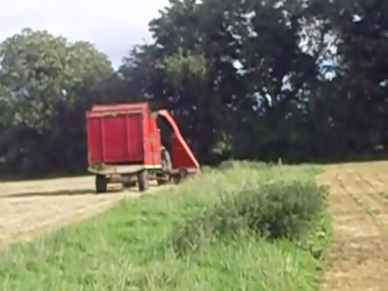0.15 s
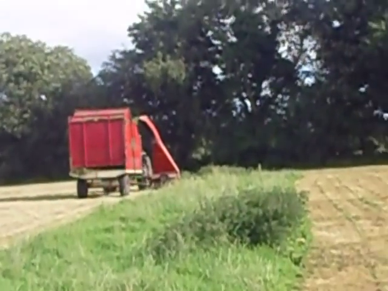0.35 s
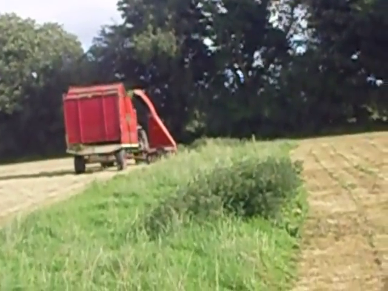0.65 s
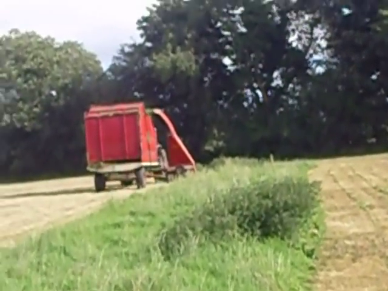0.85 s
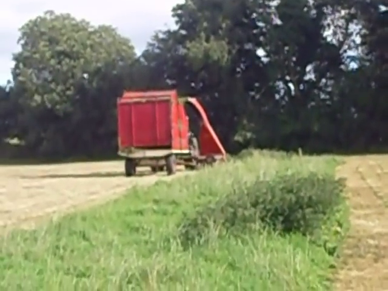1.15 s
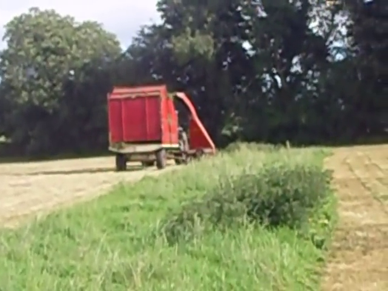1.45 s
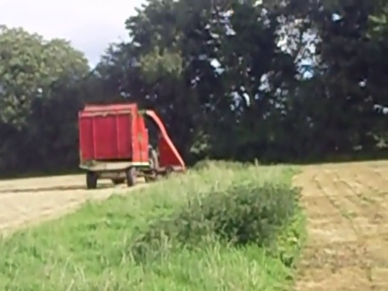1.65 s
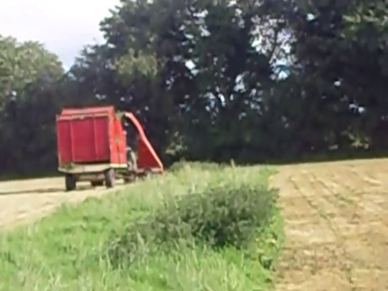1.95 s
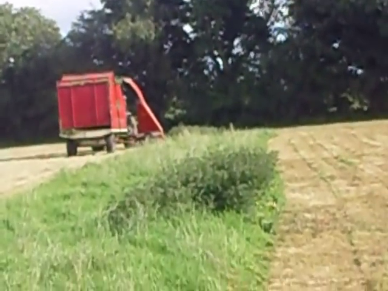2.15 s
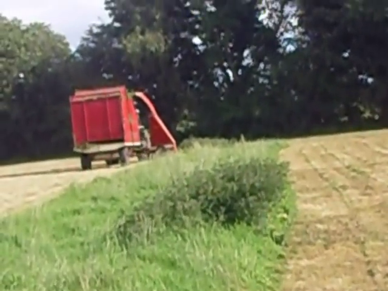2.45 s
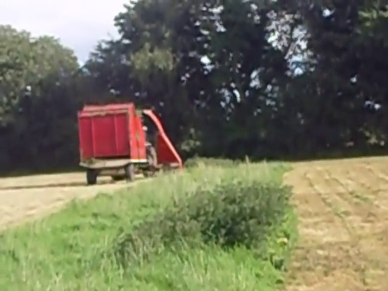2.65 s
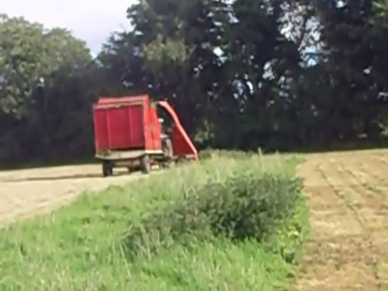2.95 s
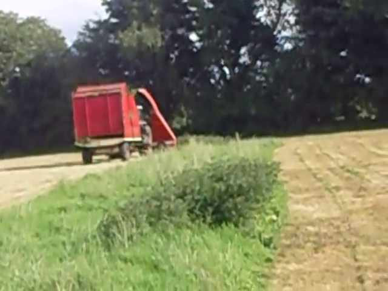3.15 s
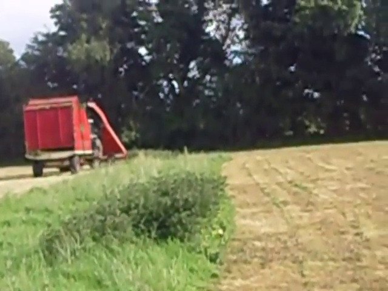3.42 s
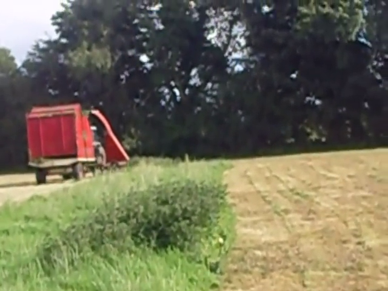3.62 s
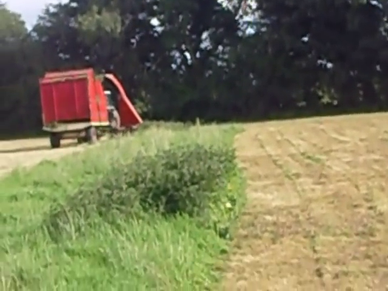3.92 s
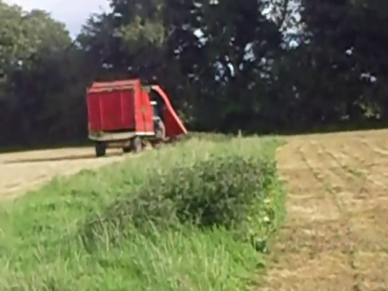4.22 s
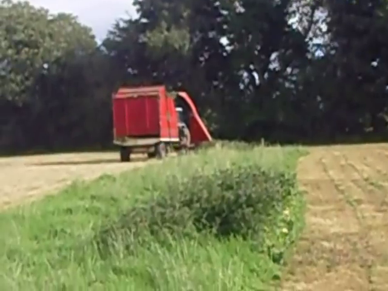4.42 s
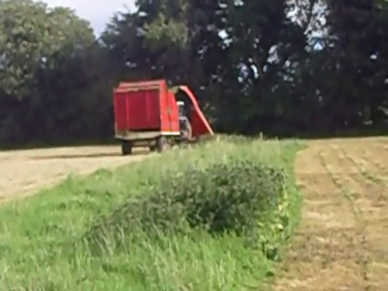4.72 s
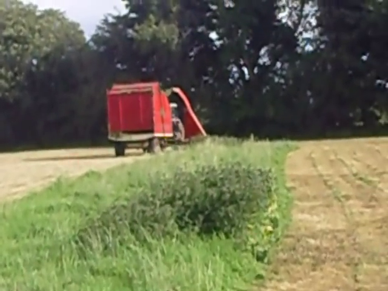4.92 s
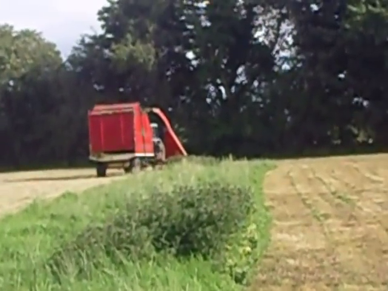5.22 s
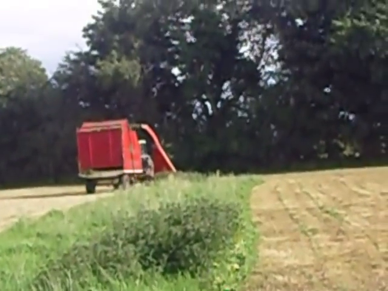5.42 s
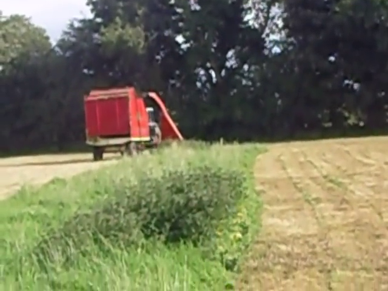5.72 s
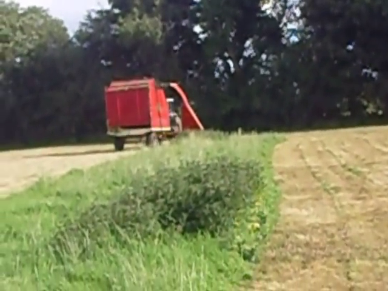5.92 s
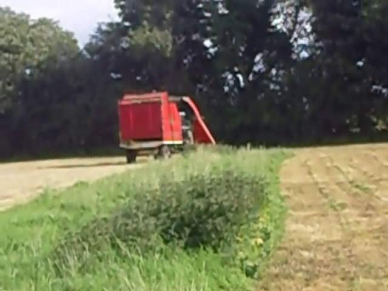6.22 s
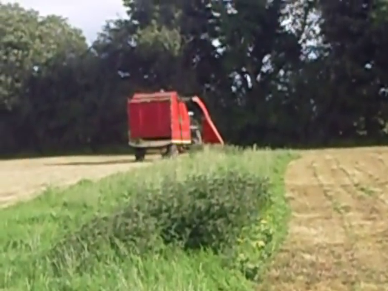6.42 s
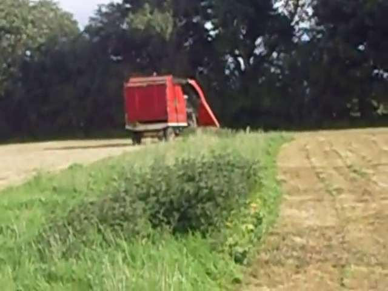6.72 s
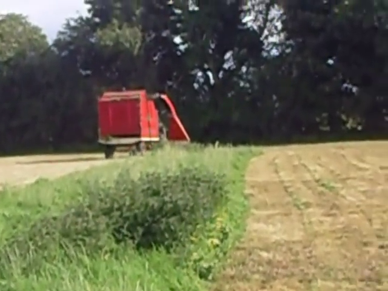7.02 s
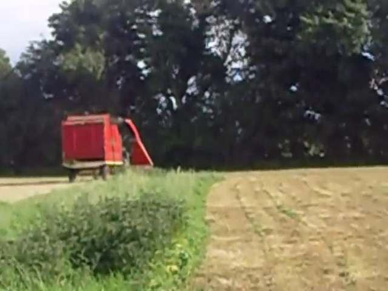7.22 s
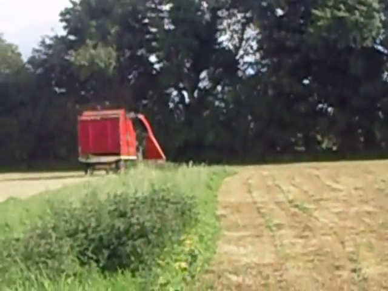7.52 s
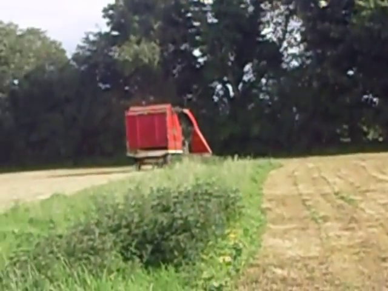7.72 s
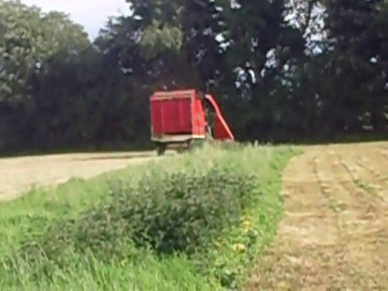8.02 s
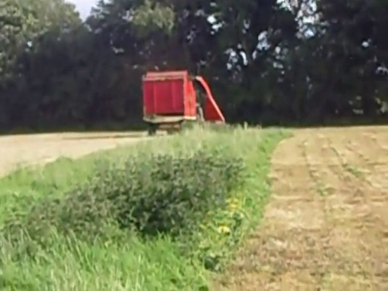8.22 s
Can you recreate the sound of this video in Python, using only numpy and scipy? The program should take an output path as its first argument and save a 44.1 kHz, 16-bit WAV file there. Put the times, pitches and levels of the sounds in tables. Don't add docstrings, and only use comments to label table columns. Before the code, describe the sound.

Low tractor engine drone with throbbing rotor, metallic flail clacks and blown-grass hiss, moving away outdoors as wind and handling bumps thud on the microphone.

```python
import sys
import numpy as np
from scipy import signal
from scipy.fft import rfft, irfft, next_fast_len
from scipy.io import wavfile
from scipy.ndimage import uniform_filter1d, map_coordinates

SR = 44100
rng = np.random.default_rng(int(sys.argv[2]) if len(sys.argv) > 2 else 0)


def decibels_to_gain(level_db):
    exponent = np.asarray(level_db, float) / 20
    return 10 ** exponent


def digitize_waveform(pressure):
    field = np.atleast_2d(pressure).T
    bounded = np.clip(field, -1, 1)
    quanta = np.round(bounded * 32767).astype(np.int16)
    wavfile.write(sys.argv[1], SR, quanta)


N = 369116

# time in seconds, cylinder firings per second.
ENGINE_SPEED = [(0, 72.4), (.3, 71.8), (1, 72.5), (2, 72.9), (2.75, 72.9), (3.2, 72.5), (4.2, 72.7),
                (4.8, 73.2), (5.1, 75), (5.5, 75.9), (6, 76.9), (6.5, 77.3), (7, 77.2), (7.5, 77.6),
                (8, 78), (8.37, 78)]
# multiple of the firing rate, level in dB against the third multiple.
EXHAUST_OVERTONES = [(4, -12.5), (5, -24)]
# multiple of the firing rate, level in dB against the throb.
ROTOR_TONES = [(2 / 3, 0), (4 / 3, -7.5), (5 / 3, -12), (7 / 3, -10.5), (8 / 3, -16), (3.42, -19)]
# time in seconds, peak in dB, dull part in dB against the peak.
FLAIL_STRIKES = [(0.625, -29, 3), (0.7964, -24.5, 0), (0.8724, -32, 10), (1.3544, -30.5, 10),
                 (1.496, -26, 3), (2.8374, -24, 3), (3.2114, -27.5, -5), (3.2779, -33, -12),
                 (3.3364, -23.5, -15), (3.3714, -28, 3), (3.4454, -29, 9), (3.7713, -30, 7.5),
                 (3.8761, -27.5, -1), (3.978, -30.5, 9), (4.058, -24, -2), (4.2617, -25.5, 4),
                 (4.341, -29, 1), (4.375, -18.5, -2.5), (4.4333, -18, -5), (4.5044, -22.5, -6),
                 (4.6114, -28, 6), (4.6404, -29, 9), (4.8474, -31, 9), (5.5209, -30.5, 4),
                 (6.7471, -28.5, 0), (6.899, -28, 0), (7.0194, -34, 8.5), (7.1816, -29.5, -3),
                 (7.2205, -29.5, -6), (7.3724, -31, -1)]
# time in seconds, case ring in dB, push on the diaphragm (negative = pull).
CASE_BUMPS = [
    (.868, -32, .04),
    (1.77, -32, .04),
    (5.328, -34, .04),
    (5.898, -35, .08),
    (5.941, -34, .1),
    (6.099, -23, .28),
    (6.1085, -22, -.25),
    (7.512, -30, .13),
    (8.111, -42, .02),
]
# frequency in Hz, level in dB per Hz.
WIND_COLOUR = [(5, -27), (12, -24), (25, -5.5), (45, -10), (80, -13), (200, -45), (400, -120)]
# frequency in Hz, level in dB.
ROAR_COLOUR = [(30, -40), (60, -1.5), (110, -2.5), (180, -4), (250, -11), (310, -19), (420, -33.5),
               (700, -38), (1200, -120)]
# frequency in Hz, level in dB.
CLATTER_COLOUR = [(190, -27), (330, -27), (437, -14.5), (498, -15), (664, -2.5), (767, 0), (874, -1.5),
                  (975, -6), (1270, -3), (1700, -7), (2210, -23), (3740, -120)]
# frequency in Hz, level in dB.
HISS_COLOUR = [(1350, -8), (2300, -5), (3080, -8), (3900, -3), (6080, -7.5), (7690, -9), (9320, -15),
               (10600, -18.5), (11700, -20.5), (17000, -29.5)]
# frequency in Hz, level in dB.
LENS_COLOUR = [(660, -16), (1320, 0), (2000, -6), (2700, -10), (3300, -12), (4000, -12), (4600, -19),
               (5300, -11), (6000, -16), (7500, -26), (8600, -17), (10500, -38)]
# frequency in Hz, width in Hz, depth from 0 to 1.
HOUSING_DIPS = [(3095, 108, 0.8), (7660, 450, 0.55), (10540, 500, 0.49), (13100, 1000, 0.2)]
# frequency in Hz, level in dB.
CHUTE_COLOUR = [(1300, -27), (1600, -11), (1950, 0.5), (2300, -8.5), (2800, -12.5), (3200, -11.5),
                (4000, -49)]
# frequency in Hz, level in dB per Hz.
STRIKE_COLOUR = [(1500, -8), (2400, -19.5), (4000, 2), (6000, -4.5), (8000, -10), (11000, -28),
                 (17000, -42)]
# time in seconds, effort in dB.
WORK_EFFORT = [(0.0, -33.5), (0.35, -30.5), (0.65, -32.5), (0.88, -29.5), (1.05, -33), (1.33, -31),
               (1.86, -36), (2.42, -34.5), (2.54, -38.5), (2.58, -33), (2.7, -38.5), (2.8, -34.5),
               (3.26, -37), (4.75, -35), (5.13, -38), (5.69, -39.5), (7.88, -41.5), (8.37, -43.5)]
# time in seconds, flow in dB.
GRASS_FLOW = [(0.0, -44), (0.02, -40.5), (1.11, -43.5), (1.36, -43), (1.83, -44.5), (2.45, -42),
              (3.44, -44.5), (3.51, -45.5), (3.97, -44), (4.07, -41), (4.32, -44), (4.37, -39.5),
              (4.85, -45), (4.97, -48), (6.66, -52), (6.94, -52), (7.93, -53.5), (8.3, -53)]
# centre in seconds, half length in seconds, change in dB.
ENGINE_STUMBLES = [
    (.42, 0.11, -14),
    (.65, .12, -11),
    (2, 0.033, -6),
    (3.6, 0.19, -3.5),
    (4.15, 0.1, -1),
    (5.45, 0.19, -4.5),
    (6.3, 0.18, -2.5),
    (7.1, .15, -5),
    (7.6, 0.12, -6.5),
]
# centre in seconds, half length in seconds, throb gain in dB.
ROTOR_SURGES = [(.1, 0.33, 3), (.6, 0.38, 15), (1.3, 0.25, 13), (2.3, 0.11, 8.5), (2.65, 0.2, 9.5),
                (3.62, 0.16, 14), (4.25, .15, 7), (4.88, 0.16, 12), (5.7, 0.29, 2.5), (6.9, .25, -4),
                (7.6, 0.065, 14)]
# centre in seconds, half length in seconds, second multiple in dB,
# third multiple in dB.
EXHAUST_SWELLS = [(.3, .2, -4, 3.5), (.6, 0.078, 1, 4), (1, 0.15, 1.5, 6.5), (1.6, 0.11, 2, -1),
                  (2, .25, 0.5, -4.5), (2.4, 0.11, 4, 0), (2.6, 0.081, -9, 5), (3.1, 0.43, 2, -6),
                  (3.6, 0.15, -4, 3.5), (3.95, 0.11, -5, 5), (4.2, .1, 4, -1), (5, 0.27, -9, -3),
                  (5.4, 0.067, 2.5, -7), (5.8, 0.074, -5, -6)]
# centre in seconds, half length in seconds, roar gain in dB.
GRASS_WADS = [(.25, 0.23, 1.5), (.85, 0.073, 4.5), (1.26, .05, -8), (1.54, 0.1, 2), (2.24, 0.12, 1.5),
              (3.08, 0.29, 3), (4.15, 0.12, 4), (4.31, 0.059, 5.5), (4.75, 0.11, 3), (4.95, 0.086, 2.5),
              (5.33, 0.05, 7), (5.92, 0.041, 5), (6.11, .03, 2.5), (6.8, .2, -1.5), (6.5, 0.043, 0),
              (7.51, 0.037, 5.5), (7.95, 0.22, -1)]
# centre in seconds, half length in seconds, dB over the breeze.
WIND_GUSTS = [(.86, 0.055, 17), (1.15, .12, 18), (1.54, .08, 15.5), (2.05, .1, 10), (2.5, 0.085, 3),
              (2.8, 0.053, -7.5), (2.98, 0.044, 2), (3.27, 0.039, 6), (3.42, .04, 9), (3.8, 0.11, 8),
              (4.3, 0.046, 8), (4.52, 0.082, 15), (4.93, 0.088, 15.5), (5.3, 0.14, 12), (5.9, 0.11, 8),
              (6.11, 0.055, 11), (6.5, .05, 3.5), (6.75, 0.14, -8), (7.12, .12, 7.5), (7.27, 0.046, 4),
              (7.51, 0.058, 2), (7.95, .15, -1)]
# centre in seconds, half length in seconds,
# chute ring in dB, hiss in dB.
GRASS_CLUMPS = [(.23, .04, 2, 1), (1, 0.075, -2, -2), (2.2, 0.16, 2.5, -1.5), (3.44, 0.018, 1, 0.5),
                (3.55, .03, 2, 1), (3.75, 0.28, 1, -2), (4.11, 0.15, 2, -0.5), (4.5, 0.13, -1, -0.5),
                (4.93, .06, 4.5, 0.5), (5.18, .03, 2, 1), (5.39, 0.054, 3.5, 0), (5.52, 0.034, 1, 1),
                (6.24, 0.24, 4, 0.5), (6.76, .04, 6.5, 2.5), (7.01, .04, 5, 3), (7.24, .05, 3.5, 2),
                (7.5, 0.34, 4, 1), (8.07, 0.11, -3, 1)]
# centre in seconds, half length in seconds, dB over its rest.
TRAILER_BOOMS = [
    (.1, 0.12, 13.5),
    (.3, 0.13, 20),
    (.55, 0.11, 4),
    (.85, .08, 13),
    (1.3, .1, 8),
    (2.1, 0.11, 5),
    (2.6, 0.13, 9),
    (4.2, 0.23, 12.5),
    (5.35, .06, 11),
]
# centre in seconds, half length in seconds,
# frequency in Hz, gain in dB.
AIR_EDDIES = [
    (1.2, .2, 8800, 4.5),
    (2.9, .45, 11500, 0),
    (3.7, 0.27, 2700, 2.5),
    (4.55, .15, 2680, -6),
    (4.05, .2, 10000, -2.5),
    (5.65, 0.17, 2800, -2),
    (6.3, 0.7, 950, -5),
    (7.9, 0.38, 7000, -4.5),
]


def unit(x):
    return x / np.sqrt(np.mean(x ** 2) + 1e-20)


def along(points, hz):
    f, v = np.transpose(points)
    return np.interp(np.log(hz + 1), np.log(f + 1), v)


def curve(rows):
    s, value = np.transpose(rows)
    return np.interp(np.arange(N) / SR, s, value)


def wobble(rate):
    coarse = np.arange(0, N + 16, 16)
    knots = rng.standard_normal(int(N * rate / SR) + 4)
    return np.interp(np.arange(N), coarse, map_coordinates(knots, [coarse * rate / SR]))


def swells(rows, column=2):
    t = np.arange(0, N + 64, 64) / SR
    total = sum(row[column] * np.exp(-((t - row[0]) / row[1]) ** 2) for row in rows)
    return np.interp(np.arange(N) / SR, t, total)


def step(at_s, over_s):
    return 0.5 + 0.5 * np.tanh((np.arange(N) / SR - at_s) / over_s)


def filtered(x, response):
    m = next_fast_len(N + SR // 2)
    return irfft(rfft(x, m) * response(np.fft.rfftfreq(m, 1 / SR)), m)[..., :N]


def shape(spectrum):
    return lambda hz: decibels_to_gain(along(spectrum, hz))


def coloured(x, spectrum):
    return unit(filtered(x, shape(spectrum)))


def patchy(depth_db):
    z = signal.stft(rng.standard_normal(N + 512), nperseg=512)[2]
    field = uniform_filter1d(rng.standard_normal(z.shape), 10, 0)
    field = uniform_filter1d(field, 8, 1)
    return signal.istft(z * decibels_to_gain(depth_db * unit(field)), nperseg=512)[1][:N]


def tone(multiple, turns, flutter_db, drift):
    phase = 2 * np.pi * (multiple * turns + rng.random()) + drift * wobble(5)
    return np.sqrt(2) * decibels_to_gain(flutter_db * wobble(7.7)) * np.sin(phase)


def distance_db():
    start_m, speed_m_per_s = 28.5, 3.4
    return -20 * np.log10(1 + speed_m_per_s * np.arange(N) / SR / start_m)


def load_eased():
    return step(at_s=6.06, over_s=0.41)


def exhaust(turns):
    far_db = distance_db()
    first_db = -23 + far_db + swells(ENGINE_STUMBLES)
    second_db = -31 + 0.44 * far_db + swells(EXHAUST_SWELLS)
    third_db = -39.5 + far_db + 5.5 * load_eased() + swells(EXHAUST_SWELLS, 3)
    out = decibels_to_gain(first_db) * tone(1, turns, flutter_db=1.5, drift=0.077)
    out += decibels_to_gain(second_db) * tone(2, turns, flutter_db=1.33, drift=0.27)
    out += decibels_to_gain(second_db - 7) * tone(1.87, turns, flutter_db=1.5, drift=0.3)
    out += decibels_to_gain(second_db - 9) * tone(1.95, turns, flutter_db=1.5, drift=0.3)
    out += decibels_to_gain(third_db) * tone(3, turns, flutter_db=1.1, drift=0.14)
    for multiple, db in EXHAUST_OVERTONES:
        out += decibels_to_gain(third_db + db) * tone(multiple, turns, flutter_db=2.6, drift=0.16)
    return out


def rotor(turns):
    throb_db = -35.5 + 0.1 * distance_db() - 10 * load_eased() + swells(ROTOR_SURGES)
    tones = sum(decibels_to_gain(db) * tone(k, turns, flutter_db=2.0, drift=0.29) for k, db in ROTOR_TONES)
    return decibels_to_gain(throb_db) * tones


def trailer_boom(turns):
    return decibels_to_gain(-46.5 + swells(TRAILER_BOOMS)) * tone(1.62, turns, flutter_db=2.5, drift=0.4)


def clatter(beat, feed_db):
    noise = patchy(0.37) * decibels_to_gain(0.71 * beat + 0.88 * feed_db)
    return decibels_to_gain(curve(WORK_EFFORT) + 0.78) * coloured(noise, CLATTER_COLOUR)


def chute(beat, feed_db):
    flow_db = curve(GRASS_FLOW)
    level_db = flow_db[0] + 0.92 * (flow_db - flow_db[0]) + 2.5
    level_db += 5.5 * step(at_s=2.6, over_s=0.81)
    noise = patchy(0.38) * decibels_to_gain(1.1 * beat + 1.1 * feed_db)
    return decibels_to_gain(level_db + swells(GRASS_CLUMPS) - 3.5) * coloured(noise, CHUTE_COLOUR)


def grass_hiss(beat, feed_db):
    noise = patchy(0.39) * decibels_to_gain(1.1 * beat + 0.98 * feed_db)
    return decibels_to_gain(curve(GRASS_FLOW) + swells(GRASS_CLUMPS, 3) + 3) * coloured(noise, HISS_COLOUR)


def machine(turns):
    beat = np.cos(2 * np.pi * turns)
    feed_db = 0.36 * wobble(12) + 0.51 * wobble(45) + 0.66 * wobble(150)
    return clatter(beat, feed_db) + chute(beat, feed_db) + grass_hiss(beat, feed_db)


def roar():
    effort_db = uniform_filter1d(curve(WORK_EFFORT), size=SR // 2)
    level_db = effort_db[0] + 0.72 * (effort_db - effort_db[0]) + 6 + swells(GRASS_WADS)
    noise = rng.standard_normal(N) * decibels_to_gain(0.8 * wobble(12))
    return decibels_to_gain(level_db) * coloured(noise, ROAR_COLOUR)


def wind():
    breeze_db = -38
    level_db = breeze_db + swells(WIND_GUSTS) + 2.5
    return decibels_to_gain(level_db) * coloured(rng.standard_normal(N), WIND_COLOUR)


def camera_electronics():
    whine = decibels_to_gain(-84) * np.sin(2 * np.pi * 15735 * np.arange(N) / SR)
    return decibels_to_gain(-71.0) * rng.standard_normal(N) + whine


def clacks():
    t = np.arange(SR // 20) / SR
    bright, dull = np.zeros(N + SR), np.zeros(N + SR)
    strays_per_s, stray_db = 2, -37
    chance = rng.random((round(strays_per_s * N / SR), 3))
    strays = [(a * N / SR, stray_db + 4 * (b - 0.5), 8 * c) for a, b, c in chance]
    envelope = decibels_to_gain(-60 * t / 0.05) * (1 - np.exp(-t / 0.0012))
    for s, db, dull_db in list(FLAIL_STRIKES) + strays:
        burst = rng.standard_normal(len(t)) * envelope
        start = round(s * SR)
        bright[start:][:len(t)] += decibels_to_gain(db - 4.5) * burst
        dull[start:][:len(t)] += decibels_to_gain(db + dull_db + 1.0) * burst
    body_colour = CLATTER_COLOUR[:-2] + CHUTE_COLOUR[1:]
    bright = decibels_to_gain(4.0) * filtered(bright[:N], shape(STRIKE_COLOUR))
    return bright + decibels_to_gain(8.5) * filtered(dull[:N], shape(body_colour))


def bumps():
    t = np.arange(SR // 10) / SR
    case = np.sin(2 * np.pi * 350 * t) * decibels_to_gain(-60 * t / 0.03) * (1 - np.exp(-t / 0.002))
    u = t / 0.0014
    shove = 3.8 * u ** 2 * (1 - u / 3) * np.exp(-u)
    out = np.zeros(N + SR)
    for s, db, push in CASE_BUMPS:
        out[round(s * SR):][:len(t)] += np.sign(push) * decibels_to_gain(db + 5) * case + push * shove
    return out[:N]


def eddies(x):
    hz, t, z = signal.stft(x, SR, nperseg=1024)
    gain_db = 0
    for s, half_s, centre_hz, db in AIR_EDDIES:
        width_hz = 0.14 * centre_hz
        across_hz = (((hz - centre_hz) / width_hz) ** 2)[:, None]
        gain_db = gain_db + db * np.exp(-((t - s) / half_s) ** 2 - across_hz)
    return signal.istft(z * decibels_to_gain(gain_db), SR, nperseg=1024)[1][:N]


def lens():
    start_s, pitch_hz, level_db, uneven_turns = 8.322, 660, -41, 0.02
    t = np.arange(N) / SR - start_s
    turns = pitch_hz * t + uneven_turns * wobble(200)
    buzz = np.zeros(N)
    for k in range(1, 16):
        buzz += decibels_to_gain(along(LENS_COLOUR, k * pitch_hz)) * np.sin(2 * np.pi * (k * turns + rng.random()))
    envelope = np.clip(t / 0.015, 0, 1) * decibels_to_gain(-80 * np.clip(t - 0.02, 0, 1))
    return np.sqrt(2) * decibels_to_gain(level_db) * buzz * envelope


def scene():
    turns = np.cumsum(curve(ENGINE_SPEED)) / SR
    drone = exhaust(turns) + rotor(turns) + trailer_boom(turns)
    far = drone + eddies(machine(turns) + clacks())
    near = wind() + bumps() + lens() + camera_electronics()
    return (far + roar() + near)[None]


def roll_off(x):
    return signal.sosfilt(signal.butter(12, 17190, fs=SR, output="sos"), x)


def record(dry):
    def dips(hz):
        gain = np.ones(len(hz))
        for centre_hz, width_hz, depth in HOUSING_DIPS:
            gain *= 1 - np.clip(depth, 0, 1) / (1 + ((hz - centre_hz) / width_hz) ** 2)
        return gain
    return roll_off(filtered(dry, dips))


dry = scene()
out = record(dry)
digitize_waveform(out)
```